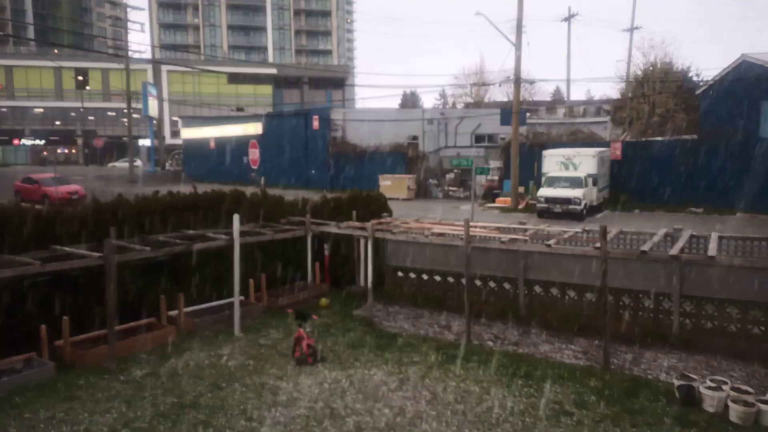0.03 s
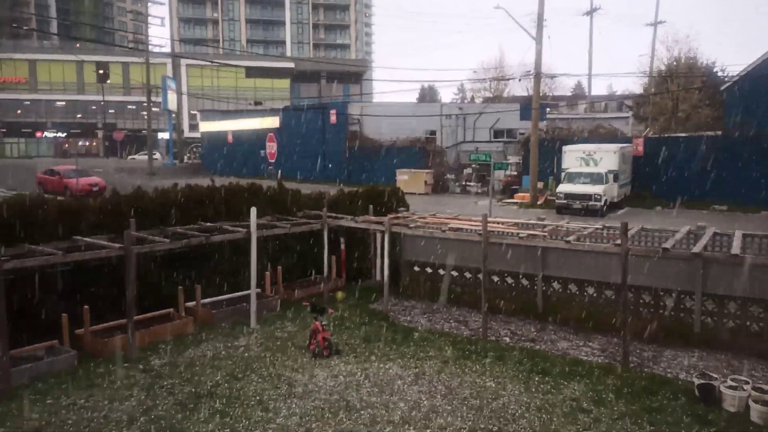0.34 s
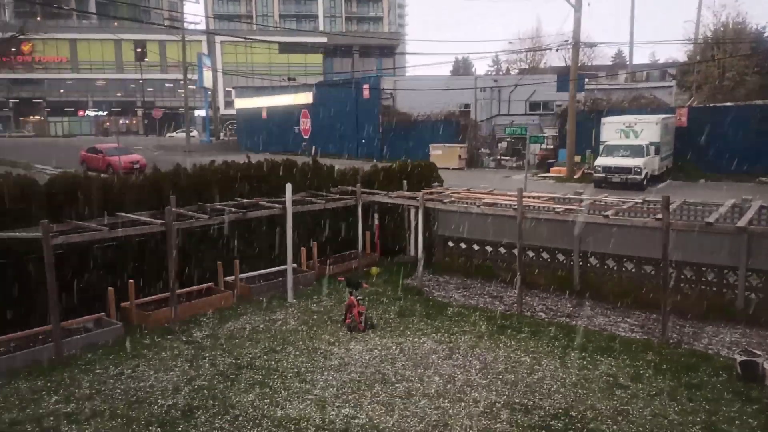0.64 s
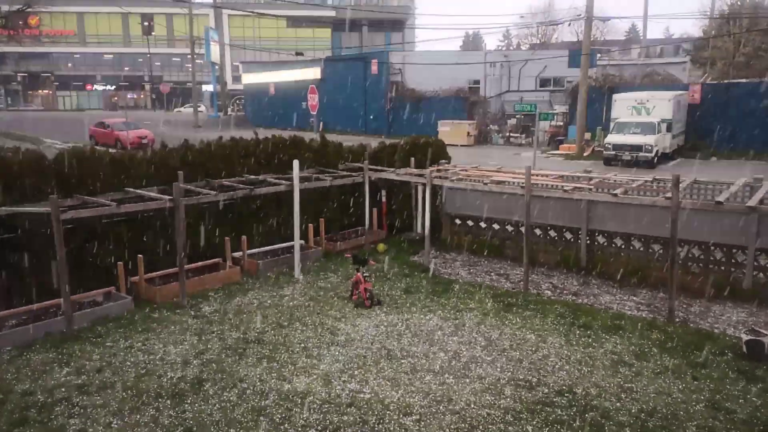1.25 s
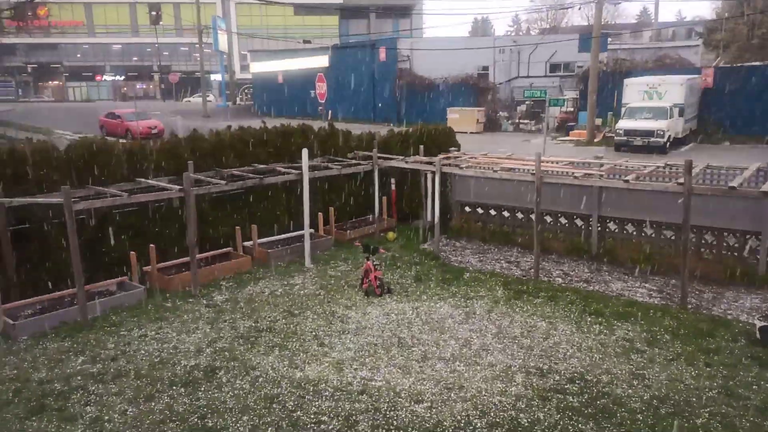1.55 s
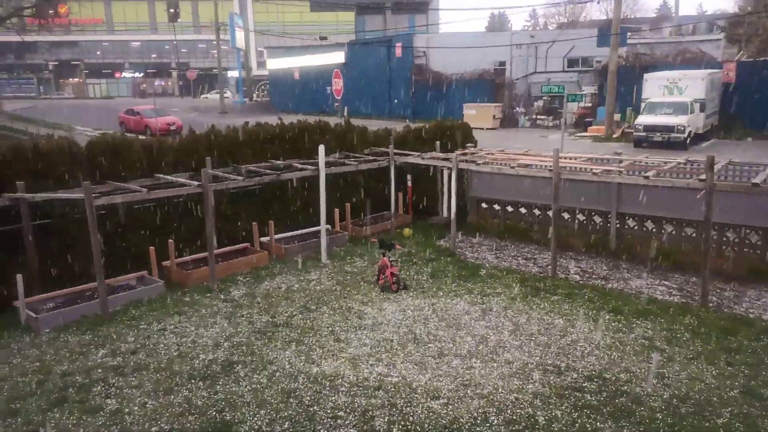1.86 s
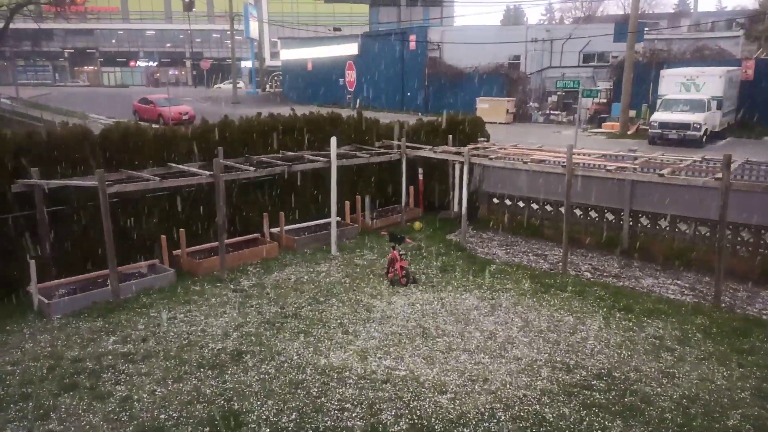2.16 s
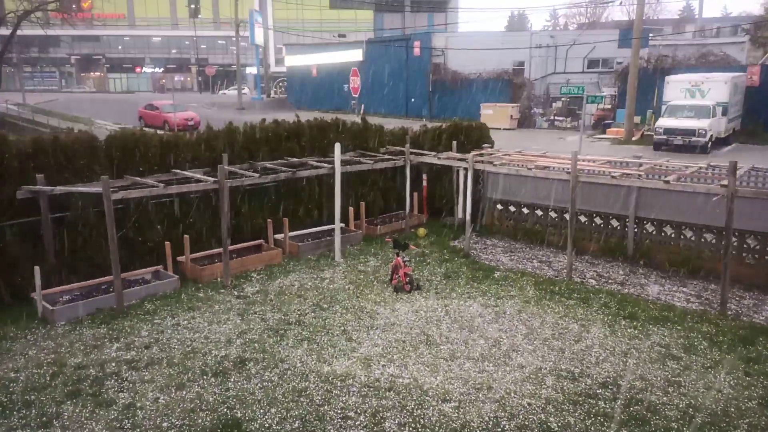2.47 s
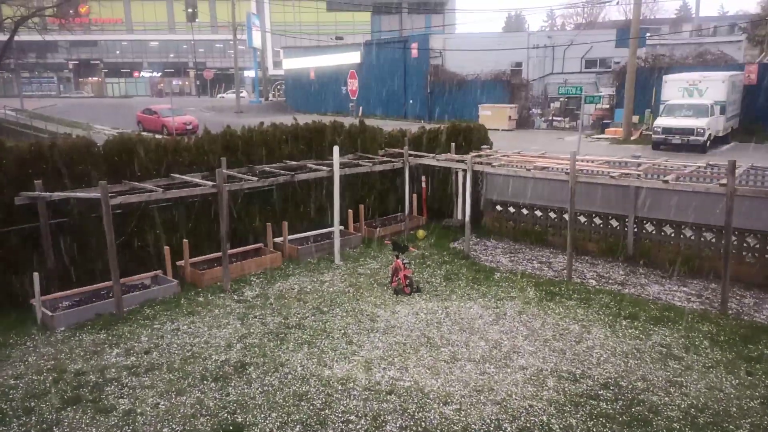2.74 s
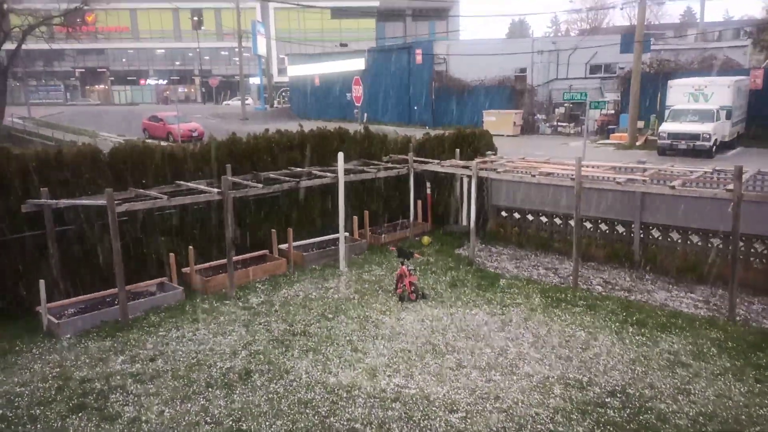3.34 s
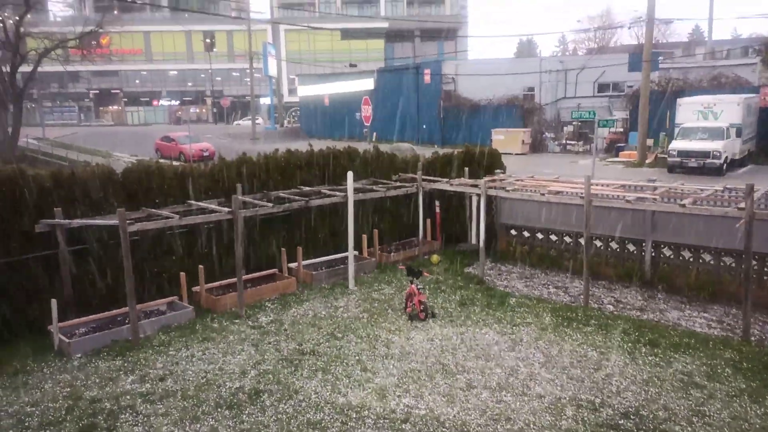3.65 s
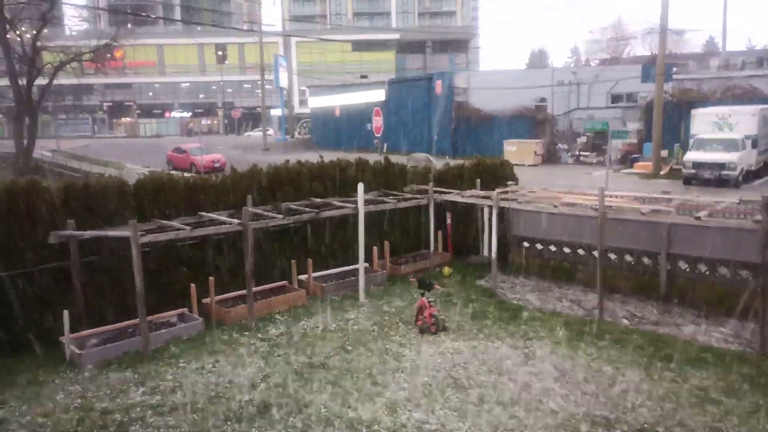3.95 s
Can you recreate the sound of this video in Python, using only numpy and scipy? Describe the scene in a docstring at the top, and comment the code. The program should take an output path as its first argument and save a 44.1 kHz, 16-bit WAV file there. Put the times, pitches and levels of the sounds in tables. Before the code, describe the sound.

Dense hail mixed with rain patters in a yard, single stones ticking and clattering close by.

```python
"""Hail and rain on a lawn

Steady fall in a fenced town yard, heard from a hand-held microphone that fades in.
Countless far stones merge into a wash; nearer ones patter, and single ones tick, ping,
clatter or knock on hard things close by. A few soft thumps shake the microphone,
mostly at the start. The town rumbles faintly."""
import sys
import numpy as np
from scipy import signal
from scipy.io import wavfile

SR = 44100
rng = np.random.default_rng(int(sys.argv[2]) if len(sys.argv) > 2 else 0)


def dump_mix(stems):
    """Bounce the given channels to the path in sys.argv[1] as a 16-bit WAV at rate SR."""
    frames = np.atleast_2d(stems).T  # one column per channel
    limited = np.clip(frames, -1, 1)  # hard clip at full scale
    pcm = np.round(limited * 32767).astype(np.int16)
    wavfile.write(sys.argv[1], SR, pcm)


N = 176400
T = np.arange(N) / SR


def wash(treble_db, upper_db, middle_db):
    """Far hail: hiss from grass and hedge, rattle from paving, drumming from roofs and fences."""
    # Each row: frequency in Hz, relative density in dB.
    spectrum = [(230, -5.5), (330, -7), (420, -9.5), (560, -4.5), (750, -10.5), (1000, -4.5), (1500, -3),
                (2000, -1.5), (2400, -1), (2950, -2.5), (3500, -7.5), (4200, -5.5), (5000, -4),
                (6100, -3.5), (7000, -11.5), (8500, -28)]
    hiss = from_db(treble_db) * banded_noise(spectrum, 3413, 9050, flicker_db=1, count=10)
    rattle = from_db(upper_db + 1) * banded_noise(spectrum, 1289.6, 3413, flicker_db=1, count=9)
    drumming = from_db(middle_db + 0.5) * banded_noise(spectrum, 223.2, 1289.6, flicker_db=2.5, count=13)
    return hiss + rattle + drumming


def patter(shower_db):
    """Nearer stones land at random; each rings for a few cycles at one of many pitches."""
    # Each row: pitch in Hz, relative level in dB.
    spectrum = [(500, -10), (800, -2.5), (1400, -7.5), (2400, 2), (3000, 4.5), (3600, -21), (5000, -11.5),
                (6500, 10)]
    stones_per_s, t60_cycles = 1300, 5.8
    pitches_hz = np.geomspace(550, 6800, num=24)
    out = 0
    for hz in pitches_hz:
        clicks = impacts(stones_per_s / len(pitches_hz), spread_db=2)
        out += from_db(at_hz(spectrum, hz)) * rms_one(ring(clicks, hz, t60_cycles / hz))
    return from_db(shower_db - 2.5) * rms_one(filtered(out, 6020, "low", order=7))


def chinks(treble_db):
    """Stones on pots and wire ring a little longer, each at its own clear pitch."""
    chinks_per_s, spread_db, t60_s = 170, 2, 0.044
    low_hz, high_hz = 2101, 6870
    t = T[T < 2 * t60_s]
    decay = from_db(-60 * t / t60_s)
    out = np.zeros(N + SR)
    for when, pitch, size in rng.random((int(chinks_per_s * N / SR), 3)):
        start = int(when * N)
        hz = low_hz * (high_hz / low_hz) ** pitch
        gain = from_db(spread_db * min(-np.log(size), 4))
        out[start:start + len(t)] += gain * np.sin(2 * np.pi * hz * t) * decay
    return from_db(treble_db - 6) * rms_one(out[:N])


def pings():
    """A hard pellet sets a small surface ringing briefly."""
    # Each row: start in seconds, level in dB, pitch in Hz.
    hits = [(0.1755, -36, 5080), (0.3765, -38, 6470), (0.3948, -35, 5300), (0.4002, -36, 3130),
            (0.4093, -46, 4580), (0.458, -39, 7340), (0.6632, -41, 5440), (0.9446, -35, 5610),
            (1.1306, -40, 2520), (1.2174, -37, 6100), (1.2524, -42, 2060), (1.2843, -36, 5370),
            (1.3576, -41, 4120), (1.5562, -37, 5350), (1.829, -37, 3040), (1.8979, -40, 5600),
            (1.9797, -38, 6130), (2.1348, -40, 5250), (2.2032, -44, 4130), (2.4052, -39, 6180),
            (2.463, -36, 2700), (2.477, -36, 2690), (2.4925, -40, 5390), (2.562, -35, 2420),
            (2.7834, -40.5, 5360), (2.9013, -36, 2100), (2.9108, -35, 2270), (2.9753, -38, 5870),
            (3.0248, -43, 3000), (3.0468, -37, 2330), (3.0942, -38, 5100), (3.1118, -37, 3200),
            (3.4718, -42, 4600), (3.592, -31.5, 5500), (3.8594, -37.5, 5830)]
    # Each row: multiple of the pitch, relative level in dB.
    modes = [(.62, -22), (.82, -8.5), (1, -0.5), (1.17, -6)]
    attack_s, t60_s = 0.0001, 0.0095
    out = np.zeros(N)
    for start_s, db, hz in hits:
        alive = (T >= start_s) & (T < start_s + 2 * t60_s)
        t = T[alive] - start_s
        tone = sum(from_db(mode_db) * np.sin(2 * np.pi * (hz * multiple * t + rng.random()))
                   for multiple, mode_db in modes)
        envelope = (1 - np.exp(-t / attack_s)) * from_db(-60 * t / t60_s)
        out[alive] += from_db(db) * tone * envelope
    return out


def ticks():
    """A stone snaps on something hard close by; a short spray of reflections follows."""
    # Each row: start in seconds, relative level in dB, low and high band edges in Hz.
    hits = [(0.1765, -37.5, 4900, 10000), (0.235, -37.5, 3000, 8500), (0.377, -42, 3500, 7900),
            (0.824, -40.5, 1490, 6260), (0.946, -36.5, 2000, 6560), (1.252, -39, 1700, 4520),
            (1.283, -38, 3530, 6860), (1.333, -41, 3000, 6900), (1.493, -38.5, 1990, 4800),
            (1.979, -40, 3560, 7900), (2.197, -44, 3500, 8560), (2.4042, -34.5, 3050, 7500),
            (2.469, -38, 2470, 8440), (2.551, -39, 2500, 8300), (2.702, -48, 2500, 8000),
            (2.911, -40, 1800, 6000), (2.919, -46, 1800, 7450), (2.923, -49, 9000, 16000),
            (2.966, -49, 5000, 12000), (3.091, -41.5, 2510, 7400), (3.112, -39, 2000, 6060),
            (3.292, -41.5, 5550, 9050), (3.590, -38, 4540, 7000), (3.7, -50, 4500, 15000)]
    out = 0
    for start_s, db, low_hz, high_hz in hits:
        envelope = dying(start_s, t60_s=0.0077) + from_db(-12.5) * dying(start_s, t60_s=0.15)
        crack = rng.standard_normal(N) * envelope
        crack[int(start_s * SR)] = 3.2  # one-sample snap
        out += 2 * from_db(db) * filtered(crack, [low_hz, high_hz], "band", order=3)
    return out


def clatters():
    """A stone bounces and scatters in a dying run of tiny contacts."""
    # Each row: start in seconds, relative level in dB, band centre in Hz.
    bounces = [(0.375, -43, 5500), (0.397, -44, 5300), (0.454, -42.5, 6400), (0.526, -42, 3200),
               (1.283, -44, 4400), (1.545, -46, 2500), (1.827, -45, 2940), (1.887, -43, 2440),
               (2.132, -41.5, 3200), (2.198, -39.5, 3620), (2.449, -38.5, 3970), (2.492, -44, 3000),
               (2.586, -41, 3020), (2.9, -46, 2370), (2.917, -41, 2440), (2.966, -44, 2780),
               (3.025, -44, 2340), (3.092, -47, 3100), (3.111, -51, 2630), (3.434, -42, 3570),
               (3.701, -38.5, 3700)]
    edge_ratio = 1.97
    contacts = impacts(per_s=4000, spread_db=0.63)
    out = 0
    for start_s, db, hz in bounces:
        grit = rms_one(filtered(contacts, [hz / edge_ratio, hz * edge_ratio], "band"))
        out += from_db(db - 4) * grit * dying(start_s, t60_s=0.087)
    return filtered(out, 7500, "low", order=4)


def knocks():
    """Stones on wood ring one main mode and a cluster of damped ones."""
    # Each row: start in seconds, relative level in dB, pitch in Hz.
    hits = [(0.289, -48.5, 492), (0.295, -49.5, 817), (0.810, -52.5, 670), (1.165, -49.5, 787),
            (1.378, -50, 873), (1.394, -51, 1235), (1.541, -55, 742), (1.742, -56, 883), (1.86, -47, 955),
            (2.263, -54, 658), (2.430, -45.5, 1063), (2.443, -45.5, 449), (2.467, -50.5, 405),
            (2.470, -46.5, 834), (2.469, -50, 1440), (2.623, -50.5, 652), (2.774, -50.5, 960),
            (2.797, -47.5, 795), (2.832, -54, 534), (2.912, -55, 802), (2.970, -51.5, 669),
            (3.030, -60, 680), (3.275, -53.5, 387), (3.328, -55.5, 250), (3.353, -56, 242),
            (3.436, -49.5, 952), (3.484, -46.5, 705), (3.586, -51, 577), (3.604, -49, 522),
            (3.611, -50, 783), (3.634, -52.5, 675), (3.914, -49, 756), (3.939, -52.5, 317)]
    edge_ratio, tone_gain = 1.47, 2 * from_db(-5.5)
    out = 0
    for start_s, db, hz in hits:
        low_hz, high_hz = hz / edge_ratio, hz * edge_ratio
        cluster = rms_one(filtered(rng.standard_normal(N), [low_hz, high_hz], "band"))
        tone = tone_gain * np.sin(2 * np.pi * hz * (T - start_s))
        knock = (cluster + tone) * dying(start_s, t60_s=0.15)
        out += from_db(db) * filtered(knock, low_hz, "high")
    return out


def hollow_things(shower_db):
    """Pots, planters and boards ring under a steady run of stones."""
    # Each row: pitch in Hz, relative level in dB, T60 in seconds.
    modes = [(475.4, -15.5, 0.049), (678, -11.5, 0.061), (882, -12, 0.13), (2362, -9, 0.022),
             (2582, -12.5, 0.027)]
    out = 0
    for hz, db, t60_s in modes:
        clicks = impacts(per_s=120, spread_db=3.06)
        out += from_db(db) * rms_one(ring(clicks, hz, t60_s))
    return from_db(shower_db) * out


def crackle():
    """Faint tones flicker for a few milliseconds at very high pitches."""
    flicks_per_s = 70
    pitches_hz = np.geomspace(7560, 13000, num=10)
    out = 0
    for hz in pitches_hz:
        clicks = impacts(flicks_per_s / len(pitches_hz), spread_db=6.5)
        out += ring(clicks, hz, t60_s=0.0059)
    return from_db(-71) * rms_one(out)


def yard(x):
    """Adds short echoes from the house wall and fence."""
    # Each row: delay in seconds, gain in dB.
    echoes = [(.0023, -14.5), (.0061, -9), (.017, -9.5)]
    return x + sum(from_db(db) * np.interp(T - delay_s, T, x, left=0) for delay_s, db in echoes)


def thumps():
    """Each nudge swings the microphone briefly, with a weaker overtone."""
    # Each row: centre in seconds, level in dB, pitch in Hz, 1/e half-width in seconds.
    nudges = [(0.201, -28, 126, 0.0075), (0.271, -47, 108, 0.027), (0.302, -40, 131, 0.018),
              (0.323, -31, 127, 0.0067), (0.353, -41, 106, 0.017), (0.377, -30.5, 121, 0.0044),
              (0.403, -43, 83, 0.038), (0.455, -30, 88, 0.011), (0.504, -41.5, 117, 0.0091),
              (0.545, -47.5, 68.5, 0.016), (2.528, -59.5, 65.5, 0.025)]
    out = np.zeros(N)
    for centre_s, db, hz, half_width_s in nudges:
        near = np.abs(T - centre_s) < 0.1
        t = T[near] - centre_s
        swing = np.cos(2 * np.pi * (hz * t + rng.random()))
        overtone = from_db(-11.5) * np.cos(2 * np.pi * (1.6 * hz * t + rng.random()))
        out[near] += from_db(db) * np.exp(-(t / half_width_s) ** 2) * (swing + overtone)
    return out


def rumble():
    """Low noise of the town and of air on the microphone."""
    # Each row: frequency in Hz, relative density in dB.
    spectrum = [(25, -40), (50, -9.5), (85, 1.5), (130, -2.5), (200, -3), (300, -9.5), (450, -28.5)]
    # Each row: time in seconds, level in dB.
    levels = [(0.15, -61), (0.3, -54.5), (0.48, -58), (0.62, -65), (1.1, -69.5), (1.45, -63.5), (1.75, -70),
              (2.5, -69), (2.9, -68), (3.1, -73), (3.33, -64.5), (3.6, -72), (4.0, -68.5)]
    level_db, = in_time(levels)
    return from_db(level_db) * banded_noise(spectrum, 31.3, 459, flicker_db=2.5, count=8)


def from_db(db):
    """Decibels to gain."""
    return 10 ** (np.asarray(db) / 20)


def rms_one(x):
    """Scales to rms 1."""
    return x / np.sqrt(np.mean(x ** 2) + 1e-20)


def in_time(rows):
    """Each value column of a time curve at every sample."""
    times_s, *columns = np.transpose(rows)
    return [np.interp(T, times_s, column) for column in columns]


def at_hz(spectrum, hz):
    """Reads a spectrum on a log-frequency axis."""
    points_hz, points_db = np.transpose(spectrum)
    return np.interp(np.log(hz), np.log(points_hz), points_db)


def filtered(x, hz, kind, order=2):
    """Butterworth filter."""
    sos = signal.butter(order, np.clip(hz, 10, 0.45 * SR), kind, fs=SR, output="sos")
    return signal.sosfilt(sos, x + 1e-18)


def drift(rate_hz):
    """Slow random wander, rms about 1."""
    hop, warm_up = 40, 2000
    pole = np.exp(-2 * np.pi * rate_hz * hop / SR)
    noise = rng.standard_normal(N // hop + warm_up + 2)
    slow = signal.lfilter([1], [1, -2 * pole, pole * pole], noise)[warm_up:]
    return np.interp(np.arange(N) / hop, np.arange(len(slow)), rms_one(slow))


def banded_noise(spectrum, low_hz, high_hz, flicker_db, count):
    """Noise bands that flicker partly together, partly on their own; rms 1."""
    edges_hz = np.geomspace(low_hz, high_hz, count + 1)
    together = 1.13 * drift(rate_hz=9.7)
    out = 0
    for low, high in zip(edges_hz, edges_hz[1:]):
        band_db = at_hz(spectrum, np.sqrt(low * high)) + flicker_db * (together + drift(rate_hz=48))
        out += from_db(band_db) * filtered(rng.standard_normal(N), [low, high], "band", order=3)
    return rms_one(out)


def dying(start_s, t60_s):
    """Envelope that jumps to 1 and decays exponentially."""
    out = np.zeros(N)
    alive = (T >= start_s) & (T < start_s + 2 * t60_s)
    out[alive] = from_db(-60 * (T[alive] - start_s) / t60_s)
    return out


def impacts(per_s, spread_db):
    """Random clicks of either sign, many weak and few strong."""
    out = np.zeros(N)
    hit = rng.random(N) < per_s / SR
    draw = rng.uniform(-1, 1, N)[hit]
    out[hit] = np.sign(draw) * from_db(spread_db * np.minimum(-np.log(np.abs(draw)), 4.5))
    return out


def ring(clicks, hz, t60_s):
    """A resonance struck by clicks."""
    radius = from_db(-60 / (t60_s * SR))
    feedback = [1, -2 * radius * np.cos(2 * np.pi * hz / SR), radius * radius]
    return signal.lfilter([1, 0, -1], feedback, clicks + 1e-18)


def scene():
    """The whole shower, in mono."""
    # Strength of the fall. Each row: time in seconds, then treble, upper-middle and middle levels in dB.
    shower = [(0.3, -52.5, -54.5, -59), (0.42, -52, -53.5, -58), (0.65, -54, -53.5, -60.5),
              (0.88, -55, -53.5, -62.5), (1.05, -54.5, -55, -60.5), (1.2, -54.5, -53.5, -58),
              (1.55, -55.5, -53, -67), (1.7, -55, -53.5, -59), (1.95, -54, -55.5, -59.5),
              (2.2, -56.5, -52, -59.5), (2.35, -57.5, -54, -62), (2.6, -53, -52, -61.5),
              (2.7, -57, -54.5, -57.5), (2.85, -54.5, -53, -58.5), (3.05, -55.5, -53.5, -57.5),
              (3.25, -53.5, -52.5, -61.5), (3.5, -55, -53, -59.5), (3.97, -54.5, -53, -55)]
    treble_db, upper_db, middle_db = in_time(shower)
    echoed = yard(patter(upper_db) + chinks(treble_db) + pings() + crackle())
    stones = echoed + hollow_things(upper_db) + ticks() + clatters() + knocks()
    return (wash(treble_db, upper_db, middle_db) + stones + thumps() + rumble())[None]


def record(dry):
    """The microphone passes little of the top octave; a faint band of noise rises toward 15 kHz, and the sound
    fades in."""
    # Each row: frequency in Hz, relative density in dB.
    hiss_spectrum = [(7500, 0), (8700, 1.5), (10000, -2), (12000, -2.5), (13800, -9), (14700, 3.5),
                     (15700, 11.5)]
    # Each row: time in seconds, gain in dB.
    fade_in = [(0.0, -88), (0.073, -88), (0.079, -25), (0.12, -16.5), (0.19, -10), (0.24, -7.5), (0.3, -3)]
    edge_hz, cutoff_hz = 7170, 15750
    passed = filtered(dry, edge_hz, "low", order=10)
    leak = from_db(-25.5) * filtered(dry, edge_hz, "high")
    hiss = from_db(-85.5) * banded_noise(hiss_spectrum, 7500, 15730, flicker_db=0, count=12)
    fade_db, = in_time(fade_in)
    lowpass = signal.ellip(10, rp=0.5, rs=70, Wn=cutoff_hz, fs=SR, output="sos")
    return signal.sosfilt(lowpass, (passed + leak + hiss) * from_db(fade_db))


dry = scene()
out = record(dry)
dump_mix(out)
```